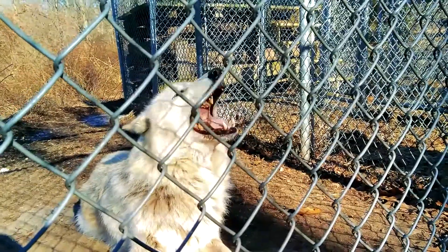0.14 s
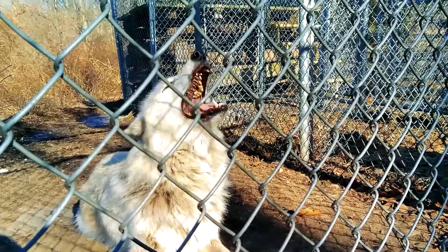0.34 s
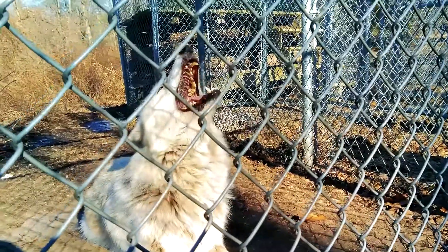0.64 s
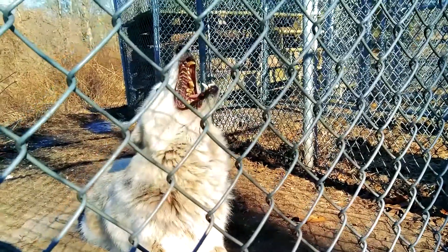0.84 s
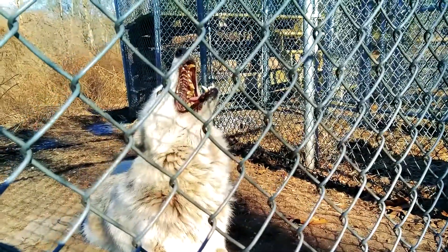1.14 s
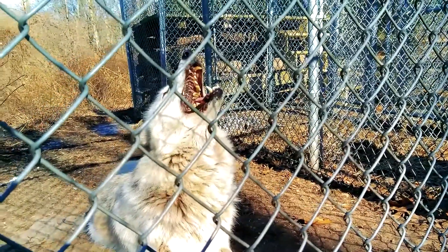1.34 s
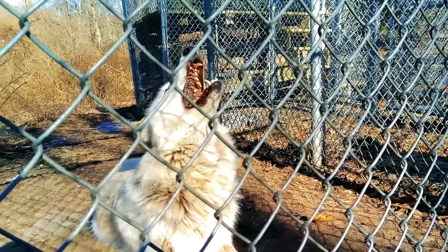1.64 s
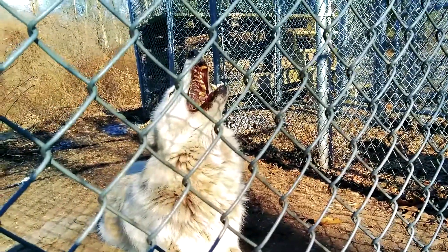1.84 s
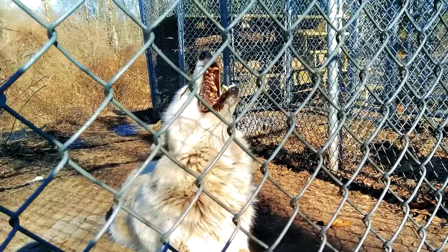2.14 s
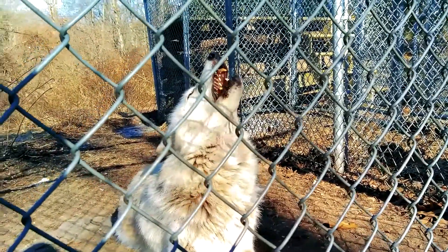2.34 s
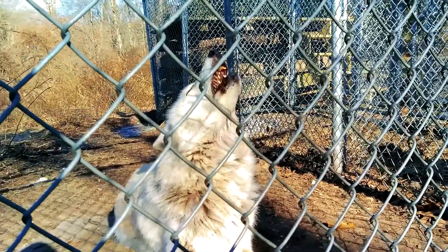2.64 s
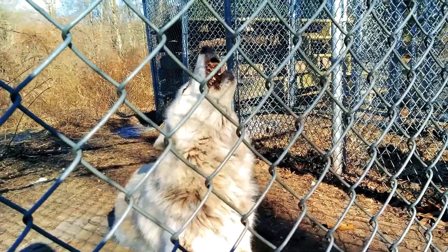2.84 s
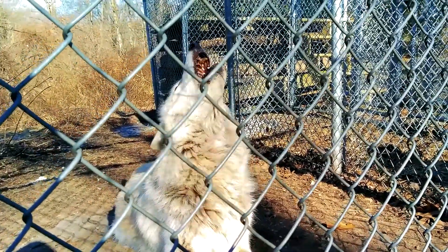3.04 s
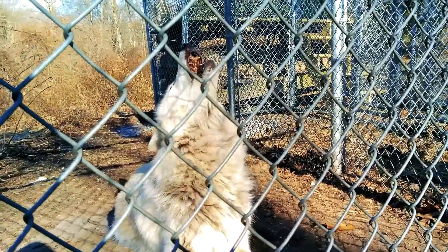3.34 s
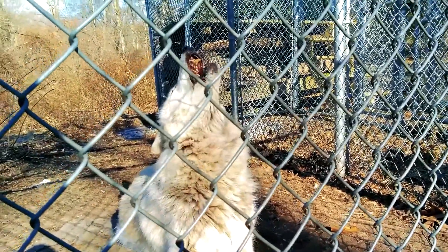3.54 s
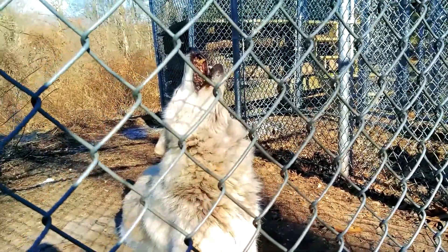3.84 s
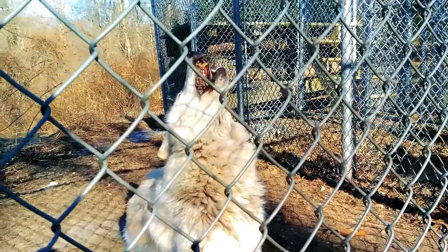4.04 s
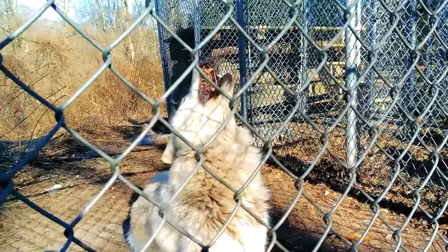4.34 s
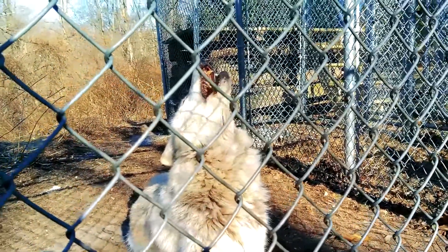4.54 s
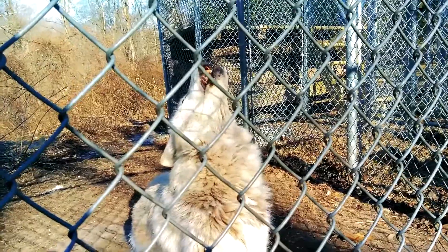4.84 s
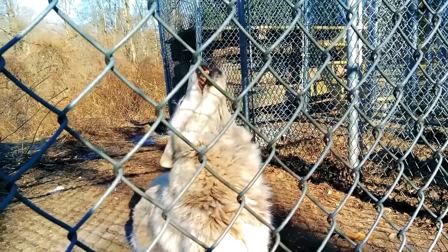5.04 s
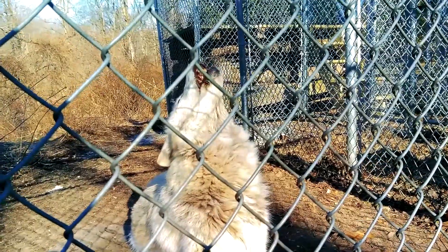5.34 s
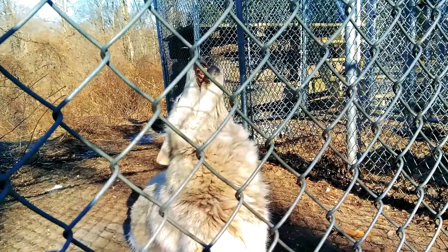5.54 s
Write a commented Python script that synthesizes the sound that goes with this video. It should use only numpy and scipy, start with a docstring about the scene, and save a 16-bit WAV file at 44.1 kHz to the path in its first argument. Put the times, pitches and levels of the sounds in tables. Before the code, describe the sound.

A wolf howls twice outdoors, near the microphone and almost without echo. The first long note is nearly pure, with a high whistle and a few soft hollow pops early on. A quick breath, rustling and a swell of wind fill the pause. The second howl climbs, wavers and drops into a beating double tone as soft knocks bump the microphone. Other wolves howl faintly in the distance.

```python
"""Outdoors, in light wind and among the calls of a distant pack, a wolf howls close to the microphone. Its
vocal folds give a nearly pure tone, joined by an independent high whistle and, early on, hollow pops. At 2.4 s
it takes one short breath; dry rustles sound and the low rumble is louder in the pause. The second howl begins
at 2.8 s; a brief side tone lies just below it at 4.3 s, dull knocks cluster late in it, and from 4.7 s the
voice splits into two beating tones."""
import sys
import numpy as np
from scipy import signal
from scipy.fft import rfft, irfft, next_fast_len
from scipy.io import wavfile
from scipy.ndimage import uniform_filter1d, map_coordinates

SR = 44100
rng = np.random.default_rng(int(sys.argv[2]) if len(sys.argv) > 2 else 0)


def dump_mix(stems):
    """Bounce the given channels to the path in sys.argv[1] as a 16-bit WAV at rate SR."""
    frames = np.atleast_2d(stems).T  # one column per channel
    limited = np.clip(frames, -1, 1)  # hard clip at full scale
    pcm = np.round(limited * 32767).astype(np.int16)
    wavfile.write(sys.argv[1], SR, pcm)


N = 250488

# Fundamental of each howl: time_s, pitch_hz
FIRST_HOWL = [(0.0, 867), (0.13, 930.7), (0.29, 912.5), (0.42, 954.4), (0.56, 915), (0.69, 896),
              (0.76, 914), (0.78, 905), (1.2, 887), (1.37, 853.9), (1.57, 772.4), (1.78, 764), (1.89, 773),
              (2.15, 766.3), (2.3, 698.7), (2.36, 670), (2.39, 604.1)]
SECOND_HOWL = [(2.81, 605.4), (2.85, 746.2), (2.86, 754.5), (3.03, 729.6), (3.45, 751.2), (3.6, 778.7),
               (3.66, 806.7), (3.82, 969.0), (3.97, 936.0), (4.22, 1011), (4.29, 958.6), (4.38, 977),
               (4.53, 922), (4.62, 799.8), (4.66, 876.0), (4.88, 773.6), (5.06, 753.5), (5.64, 733.2),
               (5.67, 720.0)]
# Brightness of the voice: time_s, second_harmonic_db, upper_harmonics_db
BRIGHTNESS = [(0, -23, -59.5), (0.14, -33.5, -47.5), (0.29, -30.5, -44), (0.44, -29, -57.5),
              (0.74, -48.5, -59), (1.12, -40.5, -63), (1.35, -47.5, -58.5), (1.7, -29, -63),
              (2.15, -29, -72.5), (2.35, -26.5, -58.5), (2.85, -40, -57.5), (3.3, -47, -63),
              (4.0, -49, -70), (4.5, -40.5, -62.5), (4.66, -49, -57.5), (4.77, -41.5, -67.5),
              (5.0, -55.5, -81.5), (5.68, -57, -91.5)]
# Balance of the upper harmonics: harmonic_number, gain_db
BUZZ_HARMONICS = [(4, -2.5), (5, -6.5), (6, 2), (7, -3), (8, -5), (9, -13), (10, -12), (11, -12.5),
                  (12, -6.5), (13, -8), (16, -22.5)]
# Cracks in the voice: centre_s, half_width_s, tremble_db
VOICE_CRACKS = [(2.4, 0.011, -8), (2.81, 0.032, -16.5), (4.63, 0.03, -15)]
# One whistle in the first howl, two in the second: time_s, pitch_hz, level_db
FIRST_WHISTLE = [(0.005, 6390, -45), (0.175, 6530, -43), (0.29, 6290, -44), (0.36, 6285, -31.5),
                 (0.48, 6130, -24), (0.68, 5725, -27.5), (0.95, 5525, -26), (1.2, 5488, -24.5),
                 (1.37, 5396, -25), (1.46, 5225, -25.5), (1.58, 5150, -28.5), (1.82, 5140, -34.5),
                 (2.19, 5086, -37.5), (2.27, 4850, -39.5), (2.35, 3960, -63)]
SECOND_WHISTLE = [(2.815, 4240, -46.5), (2.86, 4282, -38), (2.92, 4230, -36.5), (2.98, 4020, -60.5),
                  (3.41, 4075, -55.5), (3.66, 4210, -65)]
THIRD_WHISTLE = [(3.675, 4146, -51), (3.72, 4130, -36.5), (3.82, 4307, -41), (3.93, 4243, -41.5),
                 (4.1, 4296, -41.5), (4.23, 4510, -29.5), (4.3, 4427, -32), (4.38, 4560, -27.5),
                 (4.53, 4603, -26), (4.6, 4267, -31), (4.7, 4240, -57), (4.95, 4094, -66),
                 (5.67, 4070, -65.5)]
# Nearest sidebands of a middling whistle, and its octave: frequency_hz, base_level_db
SIDEBAND_SPECTRUM = [(3400, -58), (4350, -60.5), (4650, -43.5), (5200, -58), (5900, -52), (6400, -89),
                     (6900, -77.5), (7350, -33)]
OCTAVE_SPECTRUM = [(8050, -50.5), (8350, -39), (8600, -39.5), (9150, -38.5), (10200, -75), (11000, -42.5),
                   (12300, -60)]
# Colouring of the whistle's faint lines by the mouth: frequency_hz, gain_db
MOUTH_RESPONSE = [(1800, 5), (2400, 13.5), (3300, -5.5), (4500, -7.5), (5500, 20), (6800, -10), (8800, 3),
                  (11000, -1), (12400, 7.5), (13500, -4), (15500, -17.5)]
# Lower tone of the split voice: time_s, pitch_hz, level_db
LOWER_TONE = [(4.7, 604, -41), (4.73, 574, -38.5), (4.81, 529, -42.5), (4.9, 504, -49.5), (4.95, 497, -38),
              (4.99, 516.3, -25.5), (5.41, 518, -25.5), (5.655, 513.7, -23)]
# Combination tones: howl_multiple, lower_tone_multiple, level_re_lower_tone_db
COMBINATION_TONES = [(1, 1, -12), (0, 2, -25), (-1, 2, -31), (2, 1, -33), (1, 2, -34)]
# Air rushing through the mouth: time_s, relative_throat_db, relative_hiss_db
AIRFLOW = [(0, -55, -42), (0.3, -53, -50), (0.65, -54.5, -45), (0.88, -55.5, -40), (1.33, -57.5, -45),
           (1.75, -58, -58), (2.0, -69.5, -61), (2.3, -61.5, -71), (2.6, -58.5, -70), (2.85, -61, -60.5),
           (3.0, -66.5, -60.5), (3.5, -65, -60), (3.75, -56.5, -52), (4.1, -62, -58.5), (4.47, -48, -40),
           (4.63, -46.5, -49.5), (4.72, -67.5, -52.5), (5.1, -60, -67), (5.68, -57, -66)]
# Puffs of breath between the howls: centre_s, half_width_s, throat_db
BREATH_PUFFS = [(2.415, 0.016, -43), (2.5, 0.05, -54.5), (2.705, 0.025, -55.5), (2.775, 0.0092, -56)]
# Turbulence in the throat and its hiss: frequency_hz, relative_db
THROAT_SPECTRUM = [(300, -29.5), (700, -7.5), (1050, -2.5), (1400, 2), (2200, -4), (3000, -11), (4000, -12),
                   (8000, -46)]
HISS_SPECTRUM = [(2000, -32), (3700, -15), (4500, 3.5), (5700, -2.5), (7200, -14.5), (9000, -3),
                 (11000, -2.5), (13500, -7.5), (15500, -12)]
# Squeaks of the breath: centre_s, half_width_s, level_db
BREATH_SQUEAKS = [(2.52, 0.018, -52), (2.785, 0.016, -51)]
# Distant calls, and a brief side tone just below the near howl at 4.3 s:
# start_s, length_s, first_hz, middle_hz, last_hz, middle_db, growth_db, octave_gain_db
CALLS_AND_SIDE_TONE = [(0, 0.093, 436, 433, 402, -42, 2, -32),
                       (0.126, 0.64, 378.3, 359.4, 296.5, -45.5, -14.5, -28),
                       (0.645, 0.59, 740, 780, 759, -59.5, 5.5, -5.5),
                       (1.27, 0.33, 303, 325, 300, -59, 1, -11),
                       (1.538, 0.3, 566, 530, 490, -54.5, -7, -19),
                       (2.401, 0.43, 707, 680.8, 652, -42, -6.5, -2.5),
                       (2.422, 0.15, 745, 789, 715, -46, -10.5, -5),
                       (2.612, 0.077, 675, 665, 620, -49, 14.5, 0),
                       (3.005, 0.63, 539, 439, 420, -51, 9, -29.5), (3.12, 0.45, 615, 632, 633, -70, 4, 6),
                       (3.62, 0.48, 417.5, 461, 482, -48.5, 4, -23.5),
                       (3.547, 0.55, 633, 382, 319, -53.5, -6, -9.5),
                       (4.275, 0.22, 762, 756, 733, -41.5, 21, -37),
                       (4.296, 0.19, 333, 380.5, 278, -47.5, 14, -15)]
# Dry rustles, soft knocks on the camera and hollow pops: start_s, relative_db
RUSTLE_EVENTS = [(2.404, -32.5), (2.433, -38.5), (2.4844, -39.5), (2.6767, -41.5), (2.7078, -32.5),
                 (2.7616, -38.5)]
KNOCK_EVENTS = [(1.57, -45.5), (2.76, -50), (3.56, -37), (4.527, -25.5), (4.6, -32.5), (4.88, -29),
                (5.0, -32)]
POP_EVENTS = [(0.318, -28.5), (0.3348, -43.5), (0.351, -31.5), (0.3661, -36.5), (0.4549, -45.5),
              (0.4823, -34.5), (0.5275, -43.5), (0.538, -40)]
# Colours of those three sounds: frequency_hz, relative_db
RUSTLE_SPECTRUM = [(1500, -37.5), (3500, -5), (6000, 2), (9000, 5.5), (13000, 4), (15500, -10.5)]
KNOCK_SPECTRUM = [(30, -26), (100, 4), (300, -0.5), (420, -11), (700, -51)]
POP_SPECTRUM = [(500, -45), (1000, 2.5), (1400, 5.5), (1900, -8.5), (2600, -5), (5000, -30)]
# Steady wind rumble: time_s, level_db
BREEZE_LEVEL = [(0, -58), (0.6, -69.5), (1.1, -64), (1.8, -54.5), (2.3, -55), (3.1, -40), (4.2, -40.5),
                (4.75, -43), (5.2, -49), (5.68, -58)]
# Humps in the level of the low rumble, highest in the pause between the howls: centre_s, half_width_s, level_db
RUMBLE_SWELLS = [(1.42, 0.055, -56), (2.0, 0.13, -54.5), (2.45, 0.051, -26.5), (2.66, 0.051, -26.5),
                 (2.76, 0.048, -20.5), (4.35, 0.11, -36.5), (4.58, 0.099, -30.5), (4.83, 0.056, -36),
                 (4.98, 0.15, -34)]
# Light rumble, deep rumble and open air: frequency_hz, relative_db
LIGHT_RUMBLE_SPECTRUM = [(10, -9.5), (25, 1), (55, -2.5), (100, -9), (170, -15.5), (300, -26), (600, -35.5),
                         (1500, -66)]
DEEP_RUMBLE_SPECTRUM = [(10, -12), (25, -4.5), (45, 0), (70, -7), (110, -20.5), (200, -32.5), (600, -62)]
OPEN_AIR_SPECTRUM = [(30, -12.5), (200, -2), (1000, -15), (3000, -23), (10000, -10.5), (15500, -35)]
# Decay of the echo from fences and trees: frequency_hz, t60_s
ECHO_DECAY = [(200, 0.28), (1500, 0.6), (8000, 0.02)]


def wolf():
    """Superposition: the folds, whistles and breath of one animal add as sound pressures."""
    first, *first_voice = vocal_folds(FIRST_HOWL)
    second, second_hz, second_phase = vocal_folds(SECOND_HOWL)
    whistles = whistle(FIRST_WHISTLE, *first_voice, bright_db=-6, far_db=-1, fall_db=5,
                       octave_side_db=-15.5, third_db=-22, flutter_rad=0.12)
    whistles += whistle(SECOND_WHISTLE, second_hz, second_phase, bright_db=-13.5, far_db=-2, fall_db=7.5,
                        octave_side_db=-5.5, third_db=-9)
    whistles += whistle(THIRD_WHISTLE, second_hz, second_phase, bright_db=0, far_db=-12, fall_db=4,
                        octave_side_db=-16, third_db=-24)
    return first + second + whistles + split_voice(second, second_phase) + breath() + squeaks()


def vocal_folds(contour, level_db=-18.5, jitter=0.0018, mouth_resonance_hz=2290, rasp_rad=0.3):
    """Periodic vibration gives a fundamental and weak harmonics. Returns sound, pitch and phase."""
    hz = glide(curves(contour)[0])
    second_db, upper_db = curves(BRIGHTNESS)
    # The third harmonic follows the second, losing 7 dB per kHz above the mouth's lowest resonance.
    excess_khz = np.maximum(3 * hz - mouth_resonance_hz, 0) / 1000
    third_db = -54.5 + 0.65 * (second_db + 40) - 7 * excess_khz
    throat_db = curves(AIRFLOW)[0]
    tremble = amp(throat_db + 22) + swells(VOICE_CRACKS)
    phase = turns(hz * (1 + jitter * wobble(60))) + tremble * wobble(330)
    sound = tone(level_db + 0.15 * wobble(35), phase)
    sound += tone(second_db + 1.3 * wobble(40), 2 * phase)
    sound += tone(third_db + 1.5 * wobble(35), 3 * phase)
    for harmonic, gain_db in BUZZ_HARMONICS:
        buzz_db = upper_db + gain_db + 2.5 * wobble(70) + 7.5 * wobble(5.6)
        sound += tautness(hz) * tone(buzz_db, harmonic * phase + rasp_rad * wobble(180))
    shimmer = 1 + 0.61 * tremble * wobble(330)
    return sound * shimmer * gate(contour, fade_s=0.024), hz, phase


def tautness(hz):
    """Tension rises with pitch: 0 for slack folds, 1 once they are taut enough to buzz."""
    return np.clip((hz - 680) / 45, 0, 1)


def glide(hz, settle_s=0.019):
    """The throat needs time to settle, so a moving average rounds the corners of the pitch."""
    return uniform_filter1d(hz, int(settle_s * SR), mode="nearest")


def whistle(contour, howl_hz, howl_phase, bright_db, far_db, fall_db, octave_side_db, third_db,
            flutter_rad=0.041, jitter=0.0018, shimmer_db=0.98):
    """Modulation: the folds chop a high oscillator's air, making sidebands one howl pitch apart."""
    hz, db = curves(contour)
    hz = glide(hz)
    taut = tautness(howl_hz)
    drive_db = 0.78 * (db + 31.5)  # zero for a middling whistle
    lower_db = drive_db + along(SIDEBAND_SPECTRUM, hz - howl_hz)
    upper_db = drive_db + along(SIDEBAND_SPECTRUM, hz + howl_hz)
    octave_drive_db = 1.38 * np.minimum(db + 40.5, 0)  # saturates in a strong whistle
    octave_db = octave_drive_db + along(OCTAVE_SPECTRUM, 2 * hz) + bright_db
    phase = turns(hz * (1 + jitter * wobble(110))) + flutter_rad * wobble(650)
    sound = tone(db, phase) + tone(lower_db, phase - howl_phase) + tone(upper_db, phase + howl_phase)
    sound += taut * tone(octave_db + shimmer_db * wobble(82), 2 * phase + 0.33 * wobble(340))
    # Faint lines around the first three harmonics: harmonic, sideband, base_db
    outer_db = (lower_db + upper_db) / 2 + far_db
    faint = [(1, k, outer_db - fall_db * (abs(k) - 1)) for k in (-3, -2, 2, 3, 4, 5)]
    faint += [(2, k, octave_db + octave_side_db - 5 * (abs(k) - 1)) for k in (-2, -1, 1, 2, 3)]
    faint += [(3, k, octave_db + third_db - 2.5 * abs(k)) for k in (-2, -1, 0, 1, 2)]
    for harmonic, sideband, base_db in faint:
        line_hz = harmonic * hz + sideband * howl_hz
        line_db = base_db + along(MOUTH_RESPONSE, line_hz) + 2 * wobble(60)
        line_phase = harmonic * phase + sideband * howl_phase + 0.54 * wobble(160)
        sound += taut * tone(line_db, line_phase) * (line_hz < SR / 2)
    return sound * amp(shimmer_db * wobble(70)) * gate(contour, fade_s=0.0059)


def split_voice(howl, howl_phase):
    """Beating: a lower tone joins near two thirds of the pitch, and the mismatch makes both flutter."""
    hz, db = curves(LOWER_TONE)
    phase = turns(hz * (1 + 0.0014 * wobble(50))) + 0.088 * wobble(260)
    beat = np.cos(3 * phase - 2 * howl_phase)
    sound = tone(db, phase) * (1 + 0.19 * beat)
    sound += 1.32 * amp(db) * beat * howl
    for howl_multiple, lower_multiple, gain_db in COMBINATION_TONES:
        mixed_phase = howl_multiple * howl_phase + lower_multiple * phase
        sound += tone(db + gain_db, mixed_phase) * (1 + 0.31 * beat)
    return sound * gate(LOWER_TONE)


def breath(flicker_db=2.5):
    """Turbulence in the open mouth makes broadband noise, during the howls and between them."""
    throat_db, hiss_db = curves(AIRFLOW)
    puffs = swells(BREATH_PUFFS)
    throat = (amp(throat_db + 1.5) + puffs) * noise(THROAT_SPECTRUM)
    hiss = (amp(hiss_db - 3) + amp(-4) * puffs) * noise(HISS_SPECTRUM)
    return (throat + hiss) * amp(flicker_db * wobble(80))


def squeaks(pitch_hz=4300, jitter=0.023):
    """Flow-driven oscillation: the whistle catches briefly on the breath between the howls."""
    return swells(BREATH_SQUEAKS) * tone(0, turns(pitch_hz * (1 + jitter * wobble(360))))


def calls_and_side_tone(jitter=0.0027):
    """Two harmonics on a parabola of pitch make each distant call and the near howl's brief side tone."""
    sound = np.zeros(N)
    for start_s, length_s, first_hz, middle_hz, last_hz, db, growth_db, octave_db in CALLS_AND_SIDE_TONE:
        position = np.clip((clock() - start_s) / length_s, 0, 1) - 0.5  # zero halfway through
        bend_hz = 2 * (first_hz + last_hz - 2 * middle_hz)
        hz = middle_hz + (last_hz - first_hz) * position + bend_hz * position ** 2
        phase = turns(hz * (1 + jitter * wobble(40)))
        partials = tone(db, phase) + tone(db + octave_db, 2 * phase)
        window = gate([(start_s,), (start_s + length_s,)], fade_s=0.12 * length_s)
        sound += partials * amp(growth_db * position) * window
    return sound


def transients():
    """Damped bursts of noise: grainy rustles, dull knocks on the camera and a run of hollow pops."""
    grains = unit(noise(RUSTLE_SPECTRUM) * amp(3.6 * wobble(1000)))
    rustles = bursts(RUSTLE_EVENTS, rise_s=0.0019, t60_s=0.073) * grains
    knocks = bursts(KNOCK_EVENTS, rise_s=0.001, t60_s=0.12) * noise(KNOCK_SPECTRUM)
    pops = bursts(POP_EVENTS, rise_s=0.00087, t60_s=0.034) * noise(POP_SPECTRUM)
    return amp(-3) * rustles + amp(3) * knocks + amp(-4) * pops


def wind(open_air_db=-68, deep_above_db=-33):
    """Turbulence at the microphone rumbles over faint open air; the rumble deepens as it swells."""
    strength = amp(curves(BREEZE_LEVEL)[0]) + swells(RUMBLE_SWELLS)
    deep_share = strength ** 2 / (strength ** 2 + amp(deep_above_db) ** 2)
    eddies = np.sqrt(1 - deep_share) * noise(LIGHT_RUMBLE_SPECTRUM)
    eddies += np.sqrt(deep_share) * noise(DEEP_RUMBLE_SPECTRUM)
    lumps = amp(3 * wobble(26))
    return strength * unit(eddies * lumps) + amp(open_air_db) * noise(OPEN_AIR_SPECTRUM)


def echo(sound):
    """Scattering from fences and trees leaves a diffuse tail whose treble dies first."""
    hz, time_s, spectra = signal.stft(rng.standard_normal(SR // 2), SR, nperseg=256)
    decay = amp(-60 * time_s / along(ECHO_DECAY, hz)[:, None])
    tail = signal.istft(spectra * decay, SR, nperseg=256)[1]
    return signal.fftconvolve(sound, tail / np.linalg.norm(tail))[:N]


def amp(db):
    """Amplitude ratio of a level in decibels."""
    return 10 ** (np.asarray(db) / 20)


def unit(x):
    """Normalisation to rms 1."""
    return x / np.sqrt(np.mean(x ** 2) + 1e-20)


def along(points, hz):
    """Interpolation of (frequency_hz, value) points on a logarithmic frequency axis."""
    knots_hz, values = np.transpose(points)
    return np.interp(np.log(np.abs(hz) + 1), np.log(knots_hz + 1), values)


def clock():
    """The time of every sample in seconds."""
    return np.arange(N) / SR


def curves(rows):
    """Linear interpolation of each column after the time, one value per sample."""
    time_s, *columns = np.transpose(rows)
    return [np.interp(clock(), time_s, column) for column in columns]


def gate(rows, fade_s=0.036):
    """A window of 1 while a table lasts, with raised-cosine fades beyond its ends."""
    outside_s = np.maximum(rows[0][0] - clock(), clock() - rows[-1][0])
    return np.cos(np.pi / 2 * np.clip(outside_s / fade_s, 0, 1)) ** 2


def swells(rows):
    """An envelope with one Gaussian hump per row."""
    return sum(amp(db) * np.exp(-((clock() - centre_s) / half_s) ** 2) for centre_s, half_s, db in rows)


def bursts(rows, rise_s, t60_s):
    """An envelope with a fast rise and an exponential decay at each event."""
    ages = [(np.maximum(clock() - start_s, 0), db) for start_s, db in rows]
    return sum(amp(db - 60 * age / t60_s) * (1 - np.exp(-age / rise_s)) for age, db in ages)


def filtered(x, response):
    """Linear filtering: the spectrum is multiplied by a frequency response."""
    size = next_fast_len(N + 8192)
    return irfft(rfft(x, size) * response(np.fft.rfftfreq(size, 1 / SR)), size)[:N]


def noise(spectrum):
    """White noise shaped to a spectrum, at rms 1."""
    return unit(filtered(rng.standard_normal(N), lambda hz: amp(along(spectrum, hz))))


def wobble(rate_hz):
    """Smooth random modulation: a spline through rate_hz knots a second."""
    return map_coordinates(rng.standard_normal(int(N * rate_hz / SR) + 4), [clock() * rate_hz])


def turns(hz):
    """Phase in radians, the integral of angular frequency."""
    return 2 * np.pi * np.cumsum(hz) / SR


def tone(db, phase):
    """A sinusoid at an rms level."""
    return np.sqrt(2) * amp(db) * np.sin(phase)


def scene(wolf_echo_db=-36, faint_echo_db=-10):
    """Direct and scattered sound add: the wolf is almost dry, the calls and side tone echo more."""
    near, faint = wolf(), calls_and_side_tone()
    scattered = echo(amp(wolf_echo_db) * near + amp(faint_echo_db) * faint)
    return (near + faint + scattered + transients() + wind())[None]


def record(dry, limit_hz=15750):
    """Band limiting: an ideal low-pass filter removes the highest treble."""
    return filtered(dry[0], lambda hz: hz < limit_hz)[None]


dry = scene()
out = record(dry)
dump_mix(out)
```